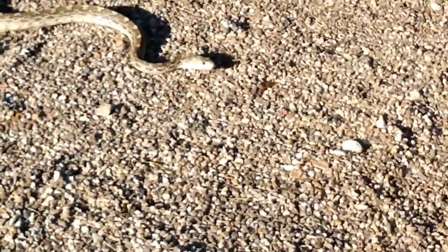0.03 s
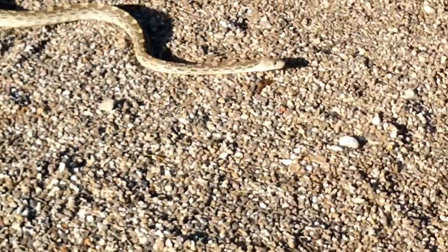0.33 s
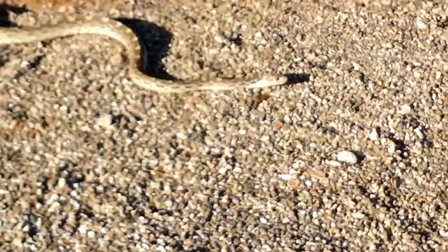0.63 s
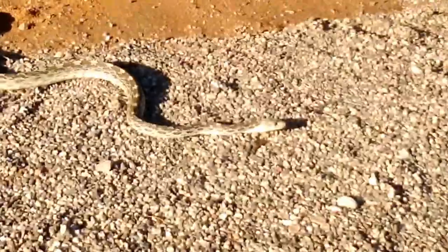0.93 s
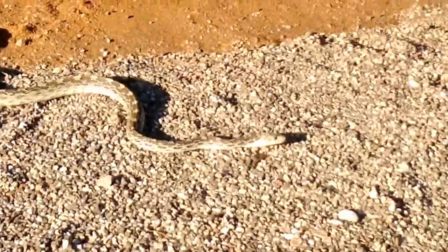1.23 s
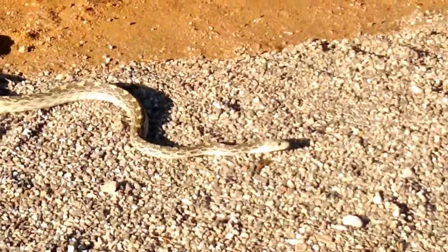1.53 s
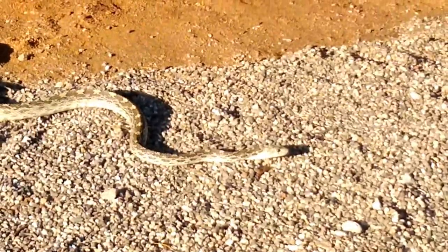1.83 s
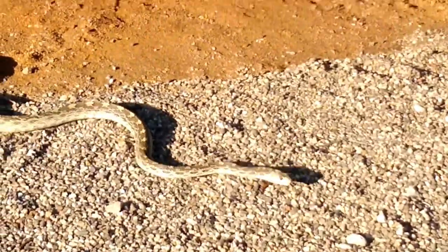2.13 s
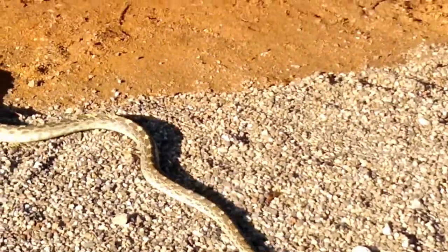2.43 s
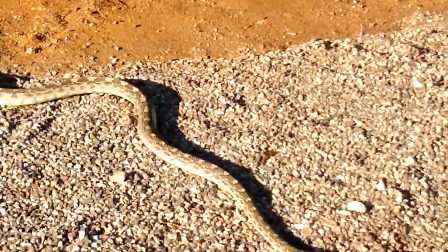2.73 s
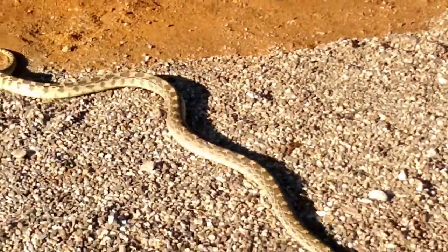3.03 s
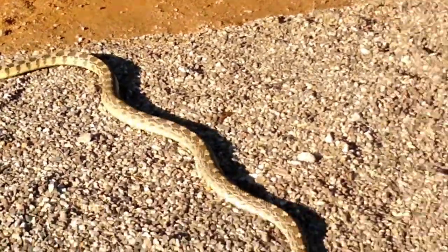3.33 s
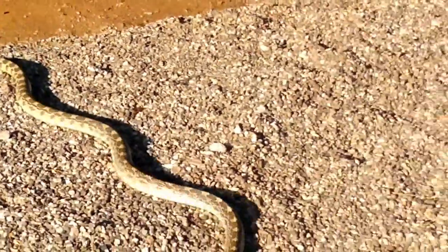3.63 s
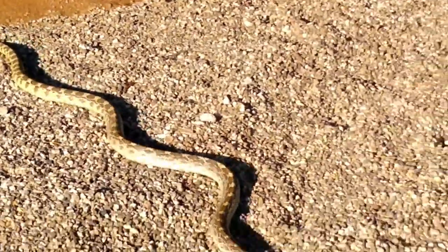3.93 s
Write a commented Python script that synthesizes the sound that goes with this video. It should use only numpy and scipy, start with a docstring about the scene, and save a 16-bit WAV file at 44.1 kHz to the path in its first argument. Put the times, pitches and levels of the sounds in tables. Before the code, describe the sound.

Wind buffets a hand-held microphone outdoors. A brief puff, sleeve rustle and scuffs give way to a lull with faint pebble ticks and a distant rush. Then a strong, bassy gust hits, followed by more rustling, scuffs and one knock.

```python
"""A hand-held camera outdoors over gravel, with a far, steady rush behind everything.
It opens on a puff of wind, sleeves rustling as the camera moves, and two close, rasping scuffs.
In the lull pebbles shift with dull ticks and a faint, thin whistle comes and goes far off.
At about 2.4 s a gust buffets the two microphone ports, which answer in opposite phase in the bass.
The sleeves stir again, more scuffs follow, and among them the case is knocked once."""
import sys
import numpy as np
from scipy.fft import rfft, irfft, next_fast_len
from scipy.io import wavfile
from scipy.ndimage import map_coordinates

SR = 44100
rng = np.random.default_rng(int(sys.argv[2]) if len(sys.argv) > 2 else 0)


def transcribe(u):
    """Save the signal u as a 16-bit wav file named by the first command-line argument.

    u: samples, shape (n,) or (channels, n), limited to [-1, 1]; the rate is SR.
    q: integer samples, one column per channel.
    """
    v = np.clip(np.atleast_2d(u).T, -1, 1)
    q = np.round(v * 32767).astype(np.int16)
    wavfile.write(sys.argv[1], SR, q)


N = 176400
TIME = np.arange(N) / SR

# Stereo images of sounds from the surroundings and of sounds at the case. Each row: frequency in Hz,
# likeness of the two ports from 0 to 1, phase lead of the left in radians, left minus right in dB.
OPEN_AIR_IMAGE = [(78.4, 0.22, 2.9, 1.5), (258, 0.1, 2, 5), (400, 0.9, -0.4, 11), (770, 0.87, 0.84, 7),
                  (1060, 0.88, 0.15, -1), (1590, .15, -0.9, 4.5), (2000, .75, -2.9, 3.5), (2260, 1, -3, -1),
                  (2690, 0.4, -2, 0), (3300, 0.7, 0.5, 3.5), (3860, 0.6, 1.5, 1), (4450, 0.98, 2.5, 2),
                  (5800, 0.1, 6.5, 2), (9000, 0, 6.5, 0)]
CASE_IMAGE = [(100, 0.94, 3, 1), (277, 1, 2, -2), (500, 0.7, 1.66, -3), (1160, 0.77, 0.5, -5),
              (2250, 0.99, -3.1, 1.5), (2630, 0.87, -1.5, -7), (3250, 0.85, 1, 4), (4300, 0.95, 2, 5.5),
              (5800, 0.78, 6.5, 7), (9000, 0.46, 8.5, 1)]


def amp(db):
    """Gain of a level in dB."""
    return 10 ** (np.asarray(db) / 20)


def unit(x):
    """Scaled to rms 1."""
    return x / np.sqrt(np.mean(x ** 2) + 1e-20)


def along(points, hz):
    """Each column of a table, read on a log-frequency axis."""
    row_hz, *columns = np.transpose(points)
    return [np.interp(np.log(hz + 1), np.log(row_hz + 1), column) for column in columns]


def fader(rows):
    """A gain curve for each dB column, muted from 30 ms beyond the first and last rows."""
    seconds, *columns = np.transpose(rows)
    inside = (TIME > seconds[0] - .03) & (TIME < seconds[-1] + .03)
    return np.array([amp(np.interp(TIME, seconds, db)) * inside for db in columns])


def wobble(rate):
    """A smooth random curve, rate knots a second."""
    return map_coordinates(rng.standard_normal(8192), [TIME * rate], mode="wrap")


def flutter(rate, depth_db):
    """A flickering random gain of rms 1."""
    return unit(amp(depth_db * wobble(rate)))


def filtered(x, response):
    """x through a complex frequency response."""
    size = next_fast_len(N + SR // 2)
    return irfft(rfft(x, size) * response(np.fft.rfftfreq(size, 1 / SR)), size)[..., :N]


def placed(x, image):
    """Gives a sound the phase and level differences of the two ports."""
    def response(hz):
        _, lead, pan_db = along(image, hz)
        left = np.exp(1j * lead / 2) * amp(pan_db / 2)
        return np.array([left, 1 / left]) / np.sqrt((amp(pan_db) + amp(-pan_db)) / 2)
    return filtered(x, response)


def stereo_noise(tone, image):
    """Coloured noise of rms 1; the less alike the ports, the more side signal."""
    def response(hz):
        likeness = np.clip(along(image, hz)[0], 0, 1)
        width = np.arccos(likeness) / 2
        return amp(along(tone, hz)[0]) * np.array([np.cos(width), np.sin(width)])
    mid, side = filtered(rng.standard_normal((2, N)), response)
    return unit(placed(np.array([mid + side, mid - side]), image))


def far_rush():
    """A soft bed of distant wind or traffic."""
    # The bed's slow drift. Each row: time in seconds, relative level in dB.
    drift = [(0, -57.5), (0.8, -55), (1.25, -56.5), (1.5, -59), (1.8, -57.5), (2.2, -59), (2.6, -55),
             (4, -59.5)]
    # Its dark colour. Each row: frequency in Hz, relative level in dB.
    tone = [(30, -17), (100, -2.5), (190, -3), (330, -9.5), (550, -3.5), (790, 0.5), (1050, -8),
            (1400, -13.5), (2200, -23.5), (3100, -28), (4400, -37.5), (5600, -39.5), (9000, -47),
            (15000, -45.5)]
    gain = amp(1.5) * fader(drift) * flutter(rate=45, depth_db=1.54)
    return gain * stereo_noise(tone, OPEN_AIR_IMAGE)


def wind():
    """Lumpy buffeting on the ports, with single eddies that each land a brief, rounded thump."""
    # The wind's rise and fall. Each row: time in seconds, relative level in dB.
    gusts = [(0, -45), (0.17, -47.5), (0.3, -64.5), (0.7, -72), (0.87, -57.5), (1.1, -71.5), (1.93, -73),
             (2.04, -58), (2.12, -67), (2.29, -64.5), (2.45, -36), (2.53, -36), (2.65, -21), (2.79, -38.5),
             (2.9, -52), (3.01, -39.5), (3.16, -34.5), (3.22, -48), (3.37, -51), (3.45, -44.5), (3.58, -65),
             (4, -60)]
    # Its bass-heavy colour. Each row: frequency in Hz, relative level in dB.
    tone = [(20, -33), (45, -9), (85, 1.5), (170, 0), (250, -12.5), (400, -15), (700, -27.5), (1500, -53.5),
            (4000, -80), (15000, -84)]
    # Near-opposite phase in the bass. Columns as in CASE_IMAGE.
    image = [(60, .998, -3.03, 1.2), (170, .997, -2.78, 1.1), (400, .97, -2.2, 1.5), (800, .7, -.5, 3),
             (3000, .4, 0, 1)]
    # Eddies hitting the ports. Each row: centre in seconds, peak in dB before panning, pitch in Hz.
    eddies = [(0.012, -24, 230), (0.838, -39.5, 200), (2.322, -29.5, 188), (2.36, -35, 170),
              (2.4, -16.5, 170), (2.411, -22, 151), (2.441, -20.5, 220), (2.458, -24.5, 190),
              (2.477, -16.5, 160), (2.529, -17, 114), (2.574, -21, 220), (2.589, -10.5, 204),
              (2.62, -3, 165), (2.65, -14, 210), (2.668, -5.5, 171), (2.69, -7.5, 278), (2.712, -6.5, 172),
              (2.72, -14, 150), (2.741, -15, 140), (2.877, -32, 160), (3.008, -18.5, 160),
              (3.056, -19, 110), (3.152, -24, 230), (3.25, -26, 240), (3.288, -22, 120),
              (3.433, -22.5, 270), (3.474, -30, 95)]
    swell_cycles = .6  # rise and decay time of a thump
    buffet = amp(3.5) * fader(gusts) * flutter(rate=55, depth_db=3) * stereo_noise(tone, image)
    thumps = np.zeros(N)
    for centre, db, hz in eddies:
        cycles = (TIME - centre) * hz
        swell = 1 / np.cosh(np.clip(2 * cycles / swell_cycles, -20, 20))
        thumps += amp(db) * swell * np.cos(2 * np.pi * cycles + rng.uniform(0, 2 * np.pi))
    return buffet + placed(thumps, image)


def sleeve_rustle():
    """Cloth rubbing on cloth: a grainy body under a finer, flickering hiss."""
    # Three arm moves, a list each. Each row: time in seconds, relative body and hiss levels in dB.
    moves = [
        [(0, -40.5, -67), (0.12, -43, -69.5), (0.19, -44, -68), (0.26, -47, -67), (0.29, -64, -74.5),
         (0.35, -60, -72), (0.37, -49, -64), (0.46, -50.5, -67), (0.49, -72, -77), (0.56, -64, -76),
         (0.575, -53, -59.5), (0.61, -58, -74), (0.9, -68, -88), (1, -95, -105)],
        [(2.3, -78, -100), (2.4, -52, -86), (2.58, -50.5, -88), (2.7, -47, -80), (2.83, -50, -72),
         (2.925, -54, -78), (2.938, -45, -57), (3.02, -42, -60), (3.11, -39.5, -59), (3.18, -33, -50),
         (3.23, -35.5, -53), (3.3, -42.5, -57.5), (3.39, -51, -67.5), (3.45, -43.5, -64), (3.6, -57.5, -89.5)],
        [(3.66, -65, -91), (3.75, -60, -67), (3.82, -56.5, -78.5), (3.894, -61, -85), (3.897, -58, -64),
         (3.904, -60, -68), (3.91, -61, -83), (4, -65, -84)],
    ]
    # The colours of the two layers. Each row: frequency in Hz, relative level in dB.
    body_tone = [(40, -25), (200, -4.5), (400, -5.5), (600, -2.5), (830, 2.5), (1250, -6), (1700, -11.5),
                 (2400, -22.5), (3200, -25), (4500, -33.5), (6000, -36), (9000, -53), (15000, -51)]
    hiss_tone = [(1000, -23), (2500, 4.5), (4500, -10.5), (6000, 4), (7500, 1), (9300, -6.5), (10500, 2),
                 (13000, 3.5), (15500, 0)]
    # Their stereo spread. Columns as in CASE_IMAGE.
    body_image = [(150, 0.26, 2.6, -3.5), (400, .6, 1, 3), (704, 0.96, 0.54, 4), (1110, 1, 0.1, -.5),
                  (1600, 0.28, 0.94, 1.5), (1900, 0.57, 3.5, -0.5), (2280, 0.98, 3, 1.5),
                  (2680, 0.47, 1.3, 2.5), (3160, 1, 0.5, 1), (4300, 1, 2.5, 1), (5900, .7, 8, 5.5),
                  (8970, .4, 6.5, 7)]
    hiss_image = [(2250, 1, -1.5, 1), (2700, .4, 0, 0), (3250, .96, -2, -1), (4400, 0.85, -0.5, 6),
                  (6150, 0.64, 11.5, 5), (7500, 0.77, 7, 7), (11000, .4, 8, 10), (15000, .3, 7, 7)]
    body_gain, hiss_gain = sum(fader(move) for move in moves)
    body = body_gain * flutter(rate=160, depth_db=2) * stereo_noise(body_tone, body_image)
    hiss = hiss_gain * flutter(rate=110, depth_db=2) * stereo_noise(hiss_tone, hiss_image)
    return amp(0.5) * body + hiss


def scuffs():
    """Short gritty strokes that swell, hold and die away."""
    # Each row is a stroke: start in seconds, length in seconds, held level in dB.
    strokes = [(0.008, 0.027, -48.5), (0.034, 0.031, -36.5), (2.862, 0.017, -55.5), (3.139, 0.04, -42),
               (3.243, 0.022, -37.5), (3.268, 0.032, -42), (3.422, 0.031, -37.5), (3.511, 0.013, -45)]
    # The colour of the rasp. Each row: frequency in Hz, relative level in dB.
    tone = [(100, -5), (400, 8.5), (1200, 2.5), (2200, -1), (3200, -2), (4200, 0.5), (5000, 0.5),
            (6000, -10.5), (6800, -28.5), (9000, -30.5), (15000, -33)]
    rise_share, release_t60_s = 0.59, 0.08
    pressure = np.zeros(N)
    for start, length, db in strokes:
        t = TIME - start
        attack = np.clip(t / (rise_share * length), 0, 1)
        pressure += attack * amp(db - 60 * np.maximum(t - length, 0) / release_t60_s)
    return pressure * flutter(rate=600, depth_db=2) * stereo_noise(tone, CASE_IMAGE)


def pebbles():
    """Shifting gravel: small dull ticks, each a few cycles long and a little off pitch."""
    # Each row is a pebble moving: start in seconds, strength in dB.
    shifts = [(0.718, -40), (0.834, -40), (0.886, -35.5), (1.023, -37.5), (1.118, -36), (1.309, -38.5),
              (2.318, -44), (2.36, -37.5), (2.396, -38), (2.688, -24), (3.424, -25)]
    centre_hz, rise_s, t60_s = 766, 0.0011, 0.021
    ticks = np.zeros(N)
    for start, db in shifts:
        t = np.clip(TIME - start, 0, .1)
        hz = centre_hz * (1 + rng.normal(0, 0.063))
        attack = 1 - np.exp(-t / rise_s)
        ticks += attack * amp(db - 60 * t / t60_s) * np.sin(2 * np.pi * hz * t)
    return placed(ticks, OPEN_AIR_IMAGE)


def far_whistle():
    """One thin, slightly wavering tone, perhaps an insect."""
    # Its fade in and out. Each row: time in seconds, level in dB.
    swell = [(1.3, -102), (1.4, -84), (1.75, -87), (2.0, -95), (2.3, -104)]
    hz = 3750 + 12 * wobble(rate=43)
    return fader(swell) * np.sin(2 * np.pi * np.cumsum(hz) / SR)


def case_knock():
    """One tap on the case: a noisy crack over a few quickly damped modes."""
    # The case's modes. Each row: frequency in Hz, relative level in dB, seconds to fall by 60 dB.
    modes = [(163, -3.5, 0.048), (338, -11.5, 0.041), (490, 0, 0.029), (738, -3.5, .028),
             (1147, -3.5, 0.015), (1378, -9, 0.014), (1800, -15, 0.018)]
    # The colour of the crack. Each row: frequency in Hz, relative level in dB.
    crack_tone = [(100, -6), (500, 6.5), (1300, 6), (2200, -2.5), (3200, -12), (5200, -13.5), (7000, -31.5),
                  (15000, -44)]
    start_s, rise_s = 3.0765, .0005
    ring_gain_db, crack_db, crack_t60_s = -7.5, -20, 0.041
    t = np.maximum(TIME - start_s, 0)
    attack = 1 - np.exp(-(t / rise_s) ** 2)
    ring = np.zeros(N)
    for k, (hz, db, t60) in enumerate(modes):
        polarity = (-1) ** k
        ring += polarity * amp(db - 60 * t / t60) * np.sin(2 * np.pi * hz * t + rng.normal(0, 0.66))
    crack = amp(crack_db - 60 * t / crack_t60_s) * stereo_noise(crack_tone, CASE_IMAGE)
    return placed(amp(ring_gain_db) * attack * ring, CASE_IMAGE) + attack * crack


def scene():
    """The far layers and the close ones, mixed at the two ports in open air."""
    distance = far_rush() + far_whistle()
    return distance + wind() + sleeve_rustle() + scuffs() + pebbles() + case_knock()


def record(dry):
    """The camera rolls off the deepest bass and keeps nothing above its band limit."""
    low_cut_hz, top_hz = 40, 15650

    def response(hz):
        s = 1j * hz / low_cut_hz
        high_pass = s * s / (s * s + np.sqrt(2) * s + 1)
        return high_pass * (hz < top_hz)
    return filtered(dry, response)


dry = scene()
out = record(dry)
transcribe(out)
```